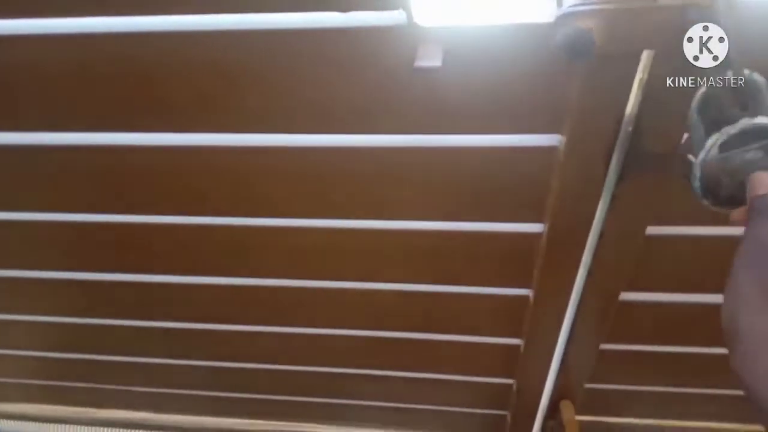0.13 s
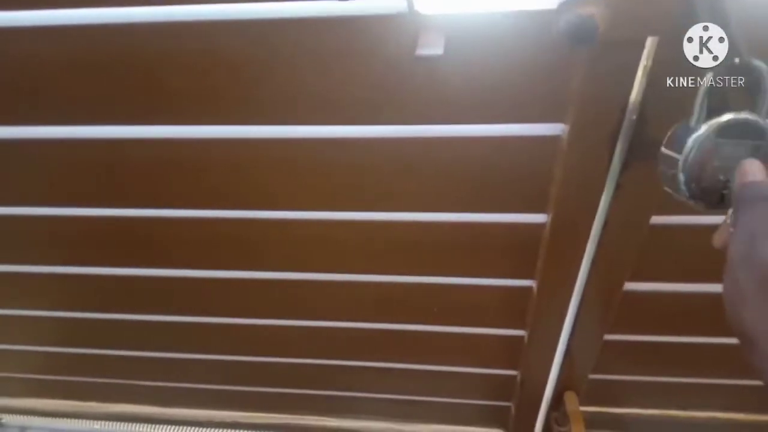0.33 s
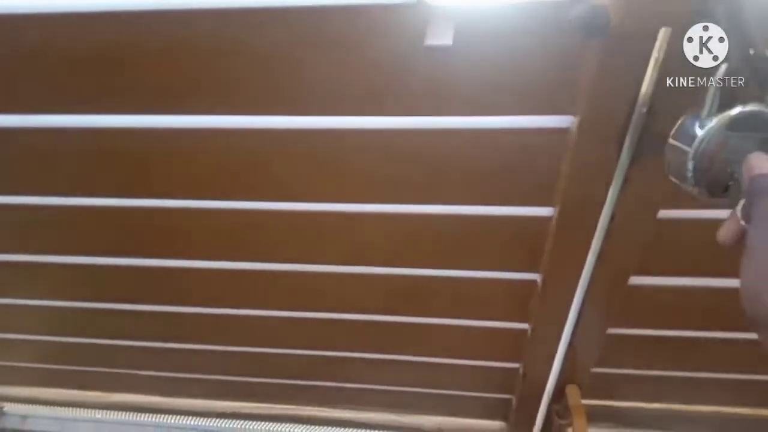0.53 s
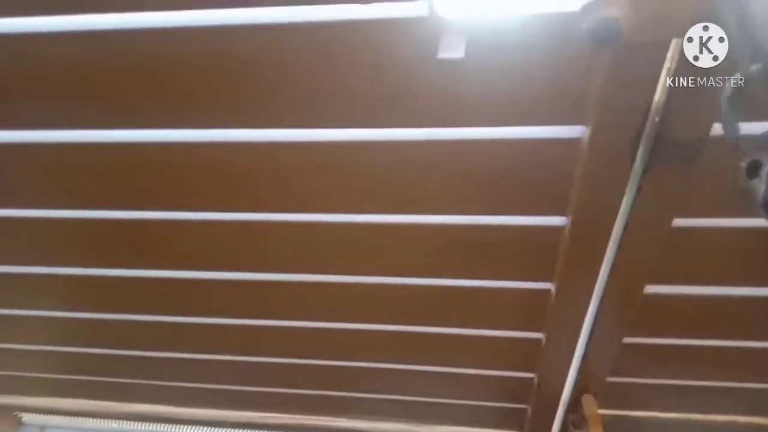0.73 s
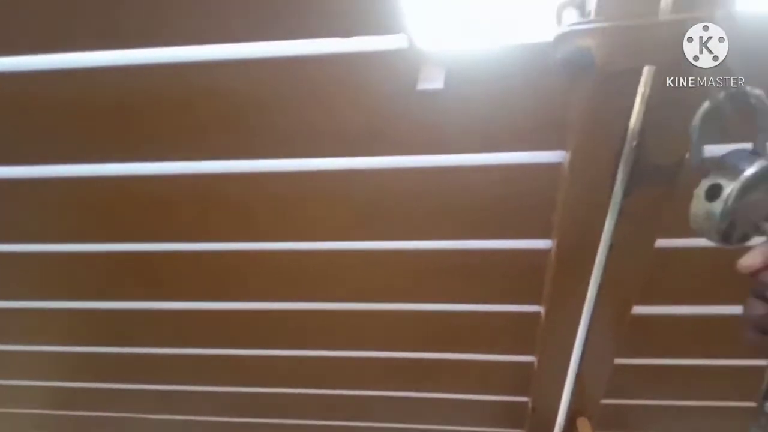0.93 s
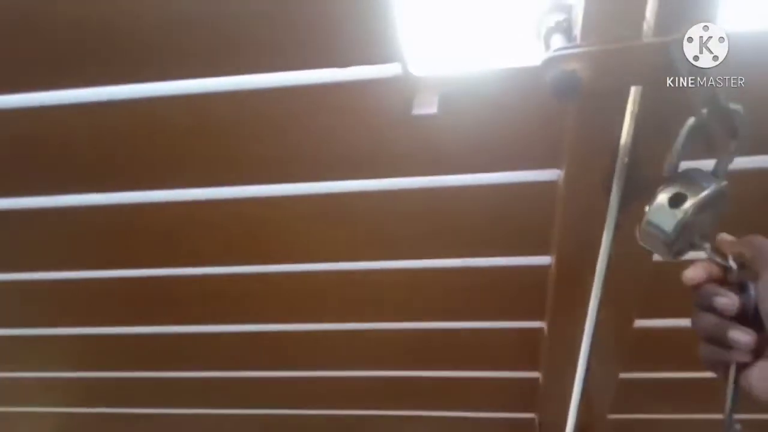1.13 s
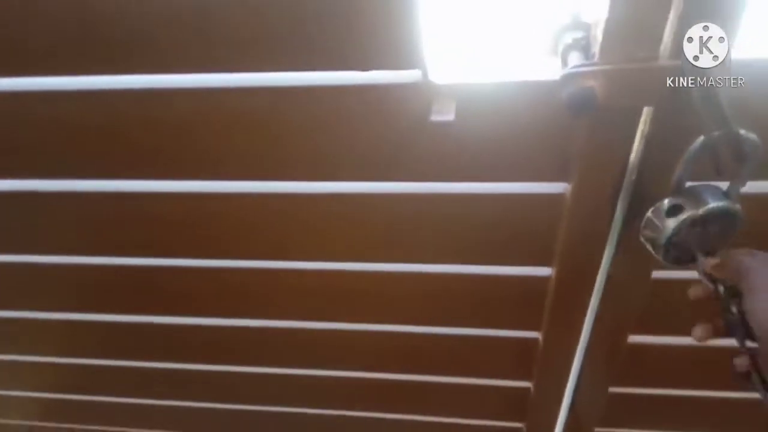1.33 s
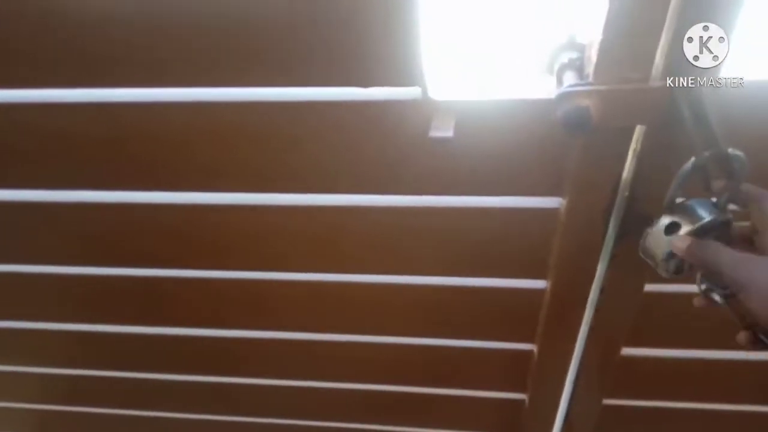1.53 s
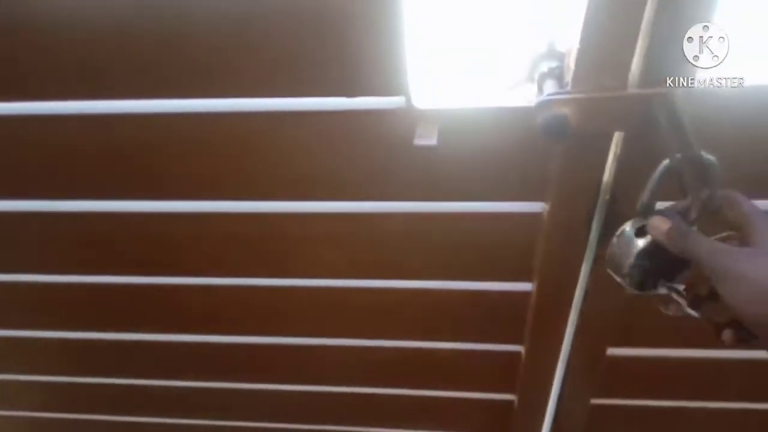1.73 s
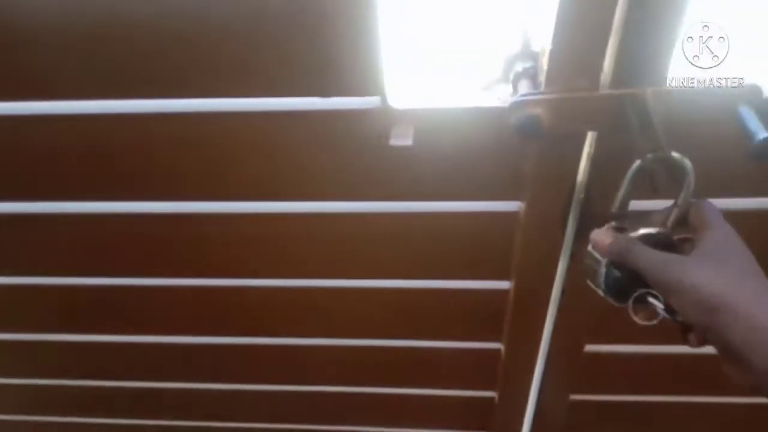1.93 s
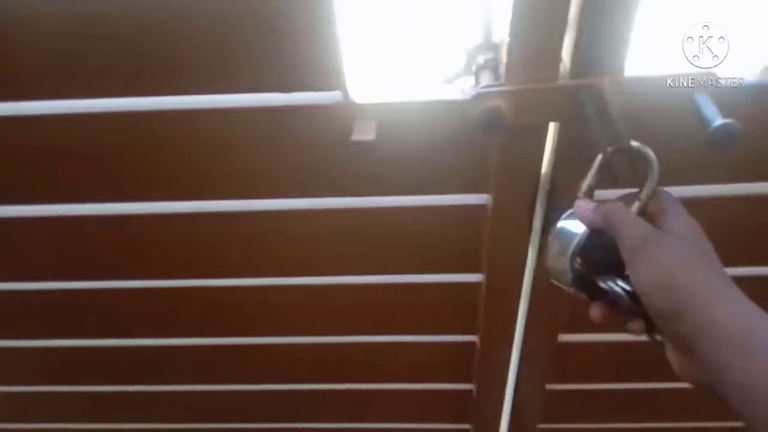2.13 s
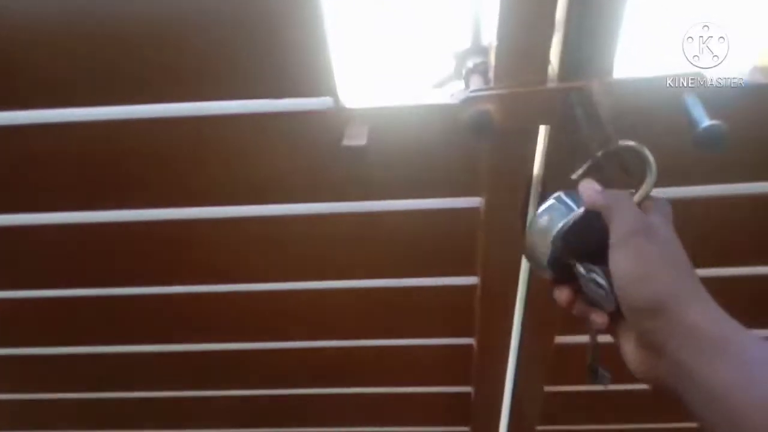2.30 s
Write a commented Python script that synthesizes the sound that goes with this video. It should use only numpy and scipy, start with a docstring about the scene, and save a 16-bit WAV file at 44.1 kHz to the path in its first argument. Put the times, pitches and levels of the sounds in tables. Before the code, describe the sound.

Close up in an echoing room, a metal padlock clacks against a door bolt. A brief steel scrape follows the first knocks, then come jingling keys and further clunks that make the wooden door boom over faint hiss.

```python
"""Padlock on a door bolt

A padlock with its keys is handled on the steel bolt of a wooden door, in a hard, echoing room.
Steel rubs on steel in tiny slips, loudest when the bolt scrapes along in its guides.
Lock and bolt knock together, so the steel rings and the door booms.
Close by, the lock snaps and the keys clink. A faint hiss lies under it all."""
import sys
import numpy as np
from scipy import signal
from scipy.fft import rfft, irfft
from scipy.io import wavfile

SR = 44100
rng = np.random.default_rng(int(sys.argv[2]) if len(sys.argv) > 2 else 0)


def pcm_store(signal):
    """Save signal as 16-bit PCM."""
    levels = np.round(np.clip(np.atleast_2d(signal), -1, 1) * 32767)
    wavfile.write(sys.argv[1], SR, levels.astype(np.int16).T)


N = 104296

# Levels in the tables are relative; t60 is the time a sound takes to fade by 60 dB.
# tone of the background hiss: f/Hz, level/dB
HISS_TONE = [(25, -32), (100, -4.5), (300, -19), (600, -2), (1300, -16.5), (2000, -12.5), (2700, -20),
             (4300, -20), (5300, -10), (10500, -17.5), (12500, -33.5), (15500, -30)]
# how long the room echoes: f/Hz, t60/s
ECHO_FADE = [(100, 0.21), (400, 1.0), (1000, 0.77), (2000, 0.7), (4000, 0.43), (7000, 0.52), (11000, 0.38),
             (16000, 0.27)]
# how strongly it echoes: f/Hz, level/dB
ECHO_TONE = [(100, -10), (450, 16), (800, 15), (1400, 10.5), (3000, 5.5), (6000, 0), (12000, -2)]
# ringing tones of the door, the bolt and the keys: f/Hz, level/dB, t60/s
DOOR_TONES = [(314, 0, .6), (356, -1, .55), (429, -6, .5), (498, -2, .55), (544, -4, .55), (604, -6, .6),
              (660, -7, .5), (708, -8, .5), (754, -5, .5), (1060, -11, .6), (1130, -10, .6)]
BOLT_TONES = [(1753, -3, .9), (1800, -2, .9), (2826, -14, .6), (3120, -9, .5), (3192, -9, .4),
              (3413, -11, .5), (3989, -8, .5), (4651, -13, .3), (4849, -7, .45), (4970, -13, .4),
              (5415, -9, .3), (5478, -12, .4), (5652, -15, .45), (5965, -11, .45)]
KEY_TONES = [(7040, -17, .12), (7452, -7, .2), (7555, 0, .18), (9900, -15, .12), (10930, -12, .15),
             (12470, -18, .18), (12690, -16, .16), (15280, -15, .16)]
# broad peaks and dips in the tone of door and fittings: f/Hz, width/Hz, lift/dB
RESONANCES = [(340, 40, 3), (1775, 90, 5), (2350, 200, -2), (3080, 260, 3), (3600, 230, -4),
              (4350, 200, -2.5), (5420, 480, 4.4)]
# the bolt sliding and the lock rubbing: t/s, door rumble/dB, steel rasp/dB
RUB_LEVELS = [(0, -39, -78), (.12, -37, -42.5), (0.281, -54, -60), (0.328, -35, -35), (0.369, -29, -52),
              (.48, -42, -85), (.53, -92, -59), (.62, -40, -62), (.67, -49, -88), (0.752, -22.5, -19),
              (0.839, -19.5, -23.5), (0.899, -32.5, -28.5), (.97, -32, -60), (1.25, -66, -59),
              (1.379, -37.5, -98), (1.7, -101, -48.5), (2.12, -96, -52.5), (2.189, -29.5, -38.5),
              (2.36, -33.5, -33.5)]
# tone of the door's rumble, the steel's rasp, a blow and a tick: f/Hz, level/dB
RUMBLE_TONE = [(40, -55), (120, -7.5), (240, -5), (1000, -3), (1700, -13.5), (2600, -15.5), (8000, -43.5)]
RASP_TONE = [(300, -21), (1200, 3), (3000, 3), (4900, 7.5), (6500, -2), (9000, -7.5), (15000, -21.5)]
BLOW_TONE = [(100, -65), (220, 7.5), (330, 13), (600, 14.5), (1000, 5.5), (5500, 8.5), (8000, 2),
             (10500, 0.5), (13000, -12), (16000, -10)]
TICK_TONE = [(200, -37), (600, -28), (1300, -16.5), (3000, -7.5), (4500, -7), (6800, 8.5), (8600, 4.5),
             (10300, 9.5), (12000, 1), (15500, 7)]
# where the six levels of a knock apply, from low boom to sharp edge: f/Hz
KNOCK_BANDS = [300, 600, 1400, 3100, 5400, 10000]
# knocks on the bolt: t/s, chatter t60/s, six times level/dB, echo and ringing/dB,
# resonance depth (a factor), door tone hit hardest/Hz, steel tone hit hardest/Hz
BOLT_KNOCKS = [(-.03, 0.06, -27.5, -29, -31, -34, -27.5, -44, -0.5, 0.15, 512, 1910),
               (.03, 0.016, -21.5, -39.5, -26, -52, -54, -68, -3.5, 2, 314, 1775),
               (0.3555, 0.072, -21.5, -20.5, -15.5, -18.5, -25.5, -32, -6.5, 0.22, 360, 2160),
               (0.6972, 0.068, -42, -35, -36.5, -28.5, -22, -22, 5.5, 0.47, 353, 5000),
               (.715, 0.036, -32.5, -46, -37, -35, -18, -25, -4.5, 0.53, 604, 6060),
               (0.7429, 0.026, -32, -36.5, -35, -19, -19.5, -21, -7, 0.19, 430, 3750),
               (.748, .045, -31, -38, -36, -28, -17.5, -26, -14, .2, 430, 4960),
               (0.9551, 0.045, -34, -38, -32, -24, -21.5, -38, -8.5, 0.1, 530, 4330),
               (1.31, 0.046, -53.5, -34, -29.5, -22.5, -12.5, -20.5, 0, 0.055, 754, 6700),
               (1.5063, 0.12, -56, -39, -30.5, -32.5, -31.5, -48, -9.5, 0.25, 430, 3230),
               (1.8326, 0.16, -60, -41, -35, -30, -32.5, -43, -9, 0.18, 610, 3989),
               (1.8816, 0.11, -53, -30, -36.5, -23, -22, -41, -10, 0.45, 604, 3989),
               (2.1397, 0.062, -31.5, -28.5, -33, -23, -18, -28.5, -1.5, 2.3, 497, 1640)]
# lock snaps and key clinks: t/s, tick/dB, tick t60/s, key ring/dB, tilt/(dB per octave),
# time until the hand damps the keys/s
SNAPS_AND_CLINKS = [(0.0541, -9, 0.008, -14.5, 1.5, 0.061), (0.6738, -10.5, 0.021, -33, -14, 0.12),
                    (0.6763, -8, 0.017, -19, 1.5, .1), (0.747, -30, .02, -19.5, -8, .12),
                    (1.1287, -27, 0.042, -80, -1.5, 0.043), (1.438, -63, 0.018, -33, 11, 0.032),
                    (1.461, -50, 0.018, -26, 5, 0.0053), (1.52, -54, .02, -28, 1, 0.025),
                    (1.6350, -22, 0.07, -26, 0, 0.081), (1.727, -32, 0.062, -25.5, -8, 0.11),
                    (1.892, -33, .03, -26, -4, 0.014), (2.353, -31, 0.036, -22, -4, 0.043)]

LEAD_S = .1  # head start, so things already ring when the sound begins


def amp(db):
    """Turns decibels into a gain."""
    return 10 ** (np.asarray(db) / 20)


def unit(x):
    """Scales a signal to an average (rms) level of 1."""
    return x / np.sqrt(np.mean(x ** 2) + 1e-20)


def read(points, hz):
    """Looks up a table between its rows, on a scale of octaves."""
    f, value = np.transpose(points)
    return np.interp(np.log(hz + 1), np.log(f + 1), value)


def add(mix, s, sound):
    """Mixes a sound in at s seconds."""
    part = mix[max(0, round((s + LEAD_S) * SR)):][:len(sound)]
    part += sound[:len(part)]


def colour(x, db_at, size=4096):
    """Filters by db_at(hz) decibels, with no sound leaking ahead of a hit."""
    log_gain = np.log(amp(db_at(abs(np.fft.fftfreq(size, 1 / SR)))))
    response = np.exp(np.conj(signal.hilbert(log_gain)))
    taps = np.fft.ifft(response).real
    return signal.fftconvolve(x, taps[:size // 2])[:len(x)]


def hiss(level_db=-42.5):
    """Steady background noise."""
    gain = amp(read(HISS_TONE, np.fft.rfftfreq(N, 1 / SR)))
    return amp(level_db) * unit(irfft(rfft(rng.standard_normal(N)) * gain, N))


def echo(x, rise_s=0.00097):
    """Hard walls throw sound back as a smooth tail, longest and strongest in the low middle."""
    hz, t, noise = signal.stft(rng.standard_normal(SR), SR, nperseg=256)
    fade = np.exp(-np.log(1000) * t / read(ECHO_FADE, hz)[:, None])
    fade *= amp(read(ECHO_TONE, hz))[:, None] / np.sqrt(SR * np.mean(fade ** 2, axis=1, keepdims=True))
    tail = signal.istft(noise * fade, SR, nperseg=256)[1][:SR]
    rise = 1 - np.exp(-np.arange(SR) / SR / rise_s)
    return signal.fftconvolve(x, tail * rise)[:len(x)]


def in_room(tones, echo_db=-7):
    """Ringing reaches the ear directly and by way of the walls."""
    return tones + amp(echo_db) * echo(tones)


def body(hz):
    """Door and fittings lift some pitches and weaken others; the result is in dB."""
    return sum(db * bump(hz, f, width) for f, width, db in RESONANCES)


def bump(hz, centre_hz, width_hz):
    """A bell curve of height 1 around one pitch."""
    return np.exp(-((hz - centre_hz) / width_hz) ** 2)


def ring(tones):
    """A struck object rings as fading sine waves, each with a random phase."""
    t = np.arange(SR) / SR
    return sum(amp(db) * np.exp(-np.log(1000) * t / t60) * np.sin(2 * np.pi * (hz * t + rng.random()))
               for hz, db, t60 in tones)


def excite(tones, force):
    """An ongoing force keeps an object ringing."""
    response = ring(tones)
    return signal.fftconvolve(force, response / np.linalg.norm(response))[:len(force)]


def rubbing(t, slips_per_s=1800, spread_db=4.5):
    """Tiny slips of steel on steel rasp in the bolt, rumble in the door and keep both ringing."""
    times, rumble_db, rasp_db = np.transpose(RUB_LEVELS)
    push = amp(np.interp(t, times, rumble_db))
    grind = amp(np.interp(t, times, rasp_db))
    slips = np.sign(rng.standard_normal(len(t))) * (rng.random(len(t)) < slips_per_s / SR)
    strength = amp(spread_db * np.minimum(rng.exponential(1, len(t)), 2))
    slips = unit(slips * strength)
    rumble = unit(colour(slips, lambda hz: read(RUMBLE_TONE, hz) + body(hz))) * push
    rasp = unit(colour(slips, lambda hz: read(RASP_TONE, hz))) * grind
    ringing = amp(-6) * excite(DOOR_TONES, slips * push) + amp(-17) * excite(BOLT_TONES, slips * grind)
    direct = amp(-7) * rumble + amp(-3) * rasp
    return direct + in_room(ringing) + echo(amp(-11) * rumble + amp(-4) * rasp)


def chatter(t60, hold_s=0, rise_s=0.00084):
    """Steel hits steel in a dense burst of contacts that dies away after hold_s."""
    t = np.arange(SR) / SR
    rise = np.minimum(t / rise_s, 1)
    fade = np.exp(-np.log(1000) * np.maximum(t - hold_s, 0) / t60)
    return np.tanh(rng.standard_normal(SR)) * rise * fade


def knock(t60, levels, tail_db, depth, door_hz, steel_hz, swell_s=0.0085):
    """A blow rings the bolt and makes the door boom. Where it lands decides which tones stand out."""
    def tone_db(hz):
        return read(list(zip(KNOCK_BANDS, levels)), hz) + 3 * bump(hz, steel_hz, width_hz=263)

    rattle = chatter(t60, hold_s=0.0056)
    blow = amp(8) * colour(rattle, lambda hz: tone_db(hz) + read(BLOW_TONE, hz) + depth * body(hz))
    steel = ring([(hz, db + tone_db(hz) + (depth - 1) * body(hz) / 2, decay)
                  for hz, db, decay in BOLT_TONES])
    panels = ring([(hz, db + tone_db(hz) + 7.5 * bump(hz, door_hz, width_hz=25.2), decay)
                   for hz, db, decay in DOOR_TONES])
    swell = 1 - np.exp(-np.arange(SR) / SR / swell_s)  # the wood takes a moment to get moving
    wood = amp(-5) * panels * swell
    return blow + amp(tail_db) * (echo(blow) + steel + in_room(wood))


def clink(tick_db, t60, ring_db, tilt_db, free_s, pivot_hz=7500, detune=.005, damping_s=0.014):
    """A bright tick rings the keys, a little differently each time, until the hand damps them."""
    def tone_db(hz):
        return read(TICK_TONE, hz) + tilt_db * np.log2(np.maximum(hz / pivot_hz, .5))

    tick = amp(tick_db + 9) * colour(chatter(t60), tone_db)
    tones = [(hz * (1 + detune * (2 * rng.random() - 1)), db + tilt_db * np.log2(hz / pivot_hz), decay)
             for hz, db, decay in KEY_TONES]
    damping = np.exp(-np.maximum(np.arange(SR) / SR - free_s, 0) / damping_s)
    keys = amp(ring_db) * ring(tones) * damping
    return tick + keys + echo(amp(-7) * tick + amp(-8) * keys)


def scene():
    """Rubbing, knocks and clinks over the hiss, in one channel."""
    lead = round(LEAD_S * SR)
    mix = rubbing(np.arange(-lead, N) / SR)
    for s, t60, *levels, tail_db, depth, door_hz, steel_hz in BOLT_KNOCKS:
        add(mix, s, knock(t60, levels, tail_db, depth, door_hz, steel_hz))
    for s, *settings in SNAPS_AND_CLINKS:
        add(mix, s, clink(*settings))
    return (mix[lead:] + hiss())[None]


def record(dry):
    """Clips the loudest snaps, then cuts the treble above 15600 Hz."""
    lowpass = signal.firwin(255, 15600, window=("kaiser", 9), fs=SR)
    return signal.oaconvolve(np.clip(dry, -1, 1), lowpass[None], "same")


dry = scene()
out = record(dry)
pcm_store(out)
```